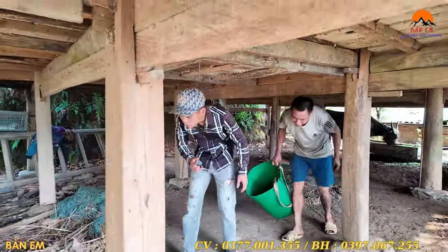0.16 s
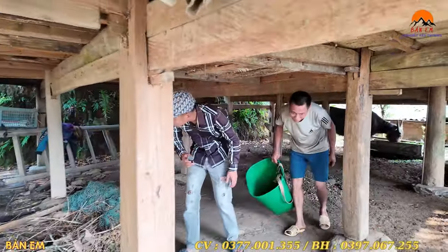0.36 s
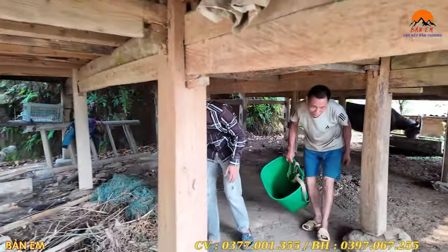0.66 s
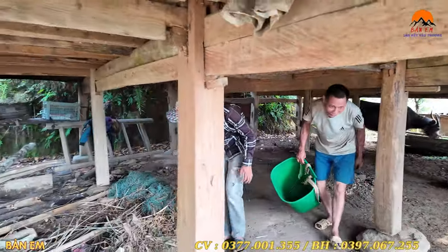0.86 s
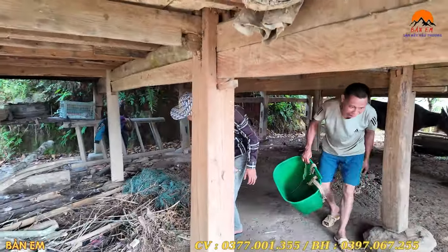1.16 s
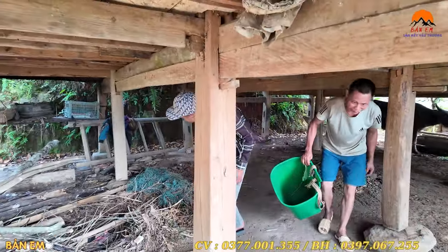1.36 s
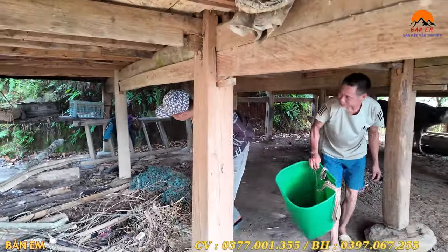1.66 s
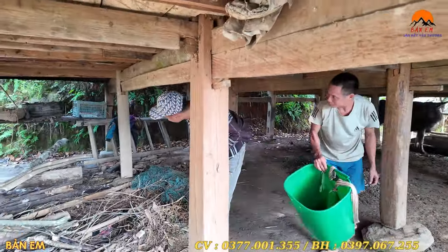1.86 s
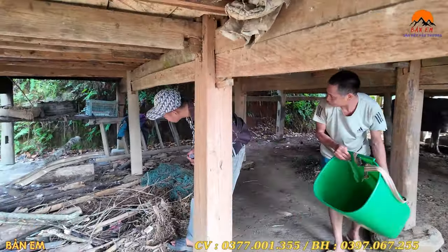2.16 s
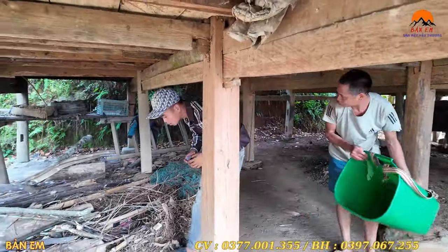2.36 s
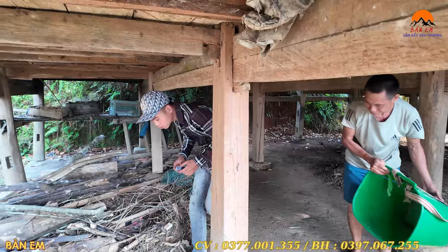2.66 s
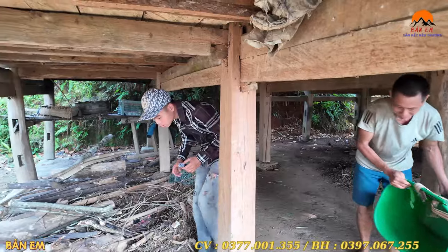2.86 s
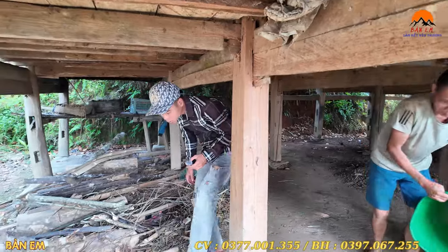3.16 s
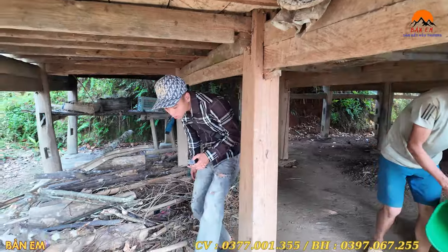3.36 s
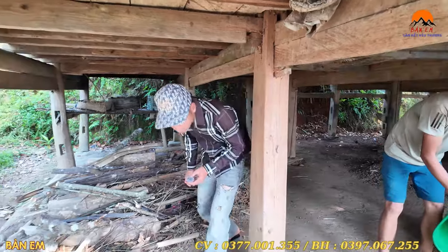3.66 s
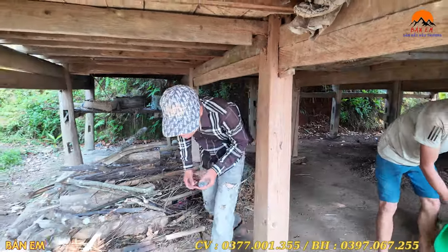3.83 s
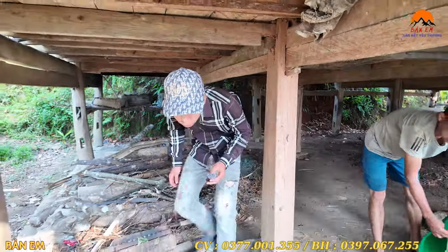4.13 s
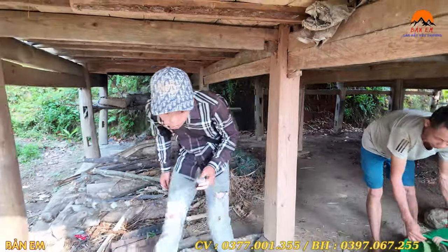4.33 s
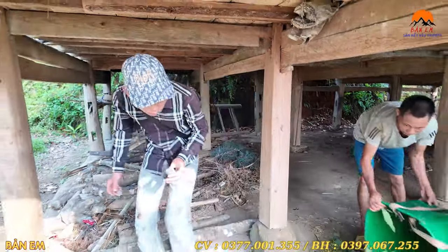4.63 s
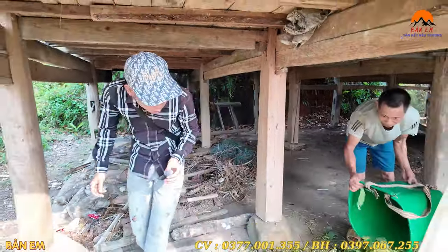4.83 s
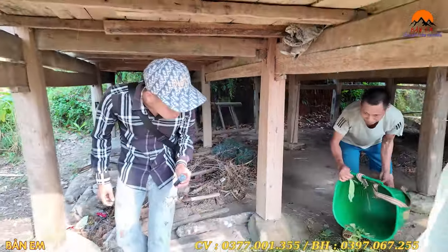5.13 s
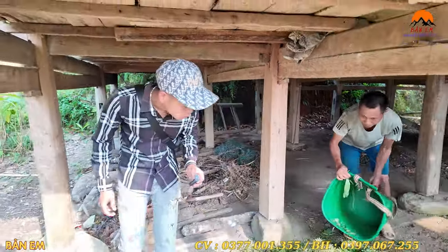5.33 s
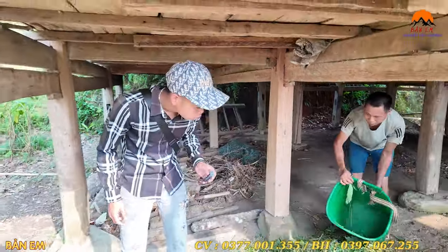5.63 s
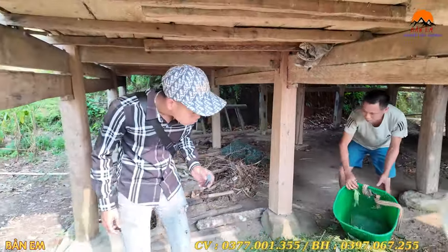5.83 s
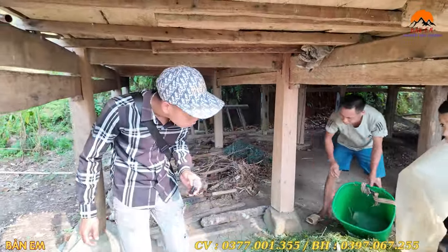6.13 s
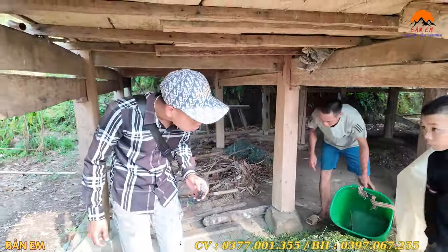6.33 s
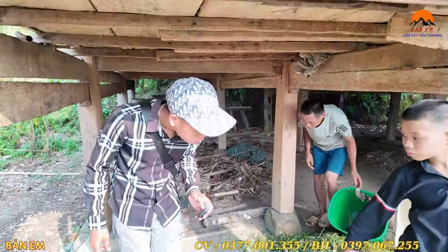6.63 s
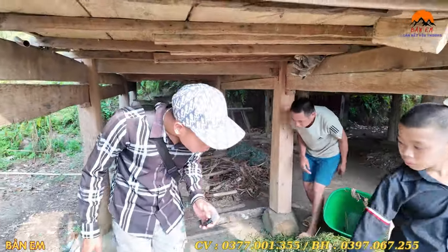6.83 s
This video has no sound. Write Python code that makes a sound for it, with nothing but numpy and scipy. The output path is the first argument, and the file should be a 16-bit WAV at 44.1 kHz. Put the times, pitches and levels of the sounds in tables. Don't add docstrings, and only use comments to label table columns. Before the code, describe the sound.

Two shrill insects drone steadily while feet shuffle over dirt and dry leaves, sticks snap, a loud wooden knock sounds, and a pig grunts in bursts.

```python
import sys
import numpy as np
from scipy import signal
from scipy.fft import rfft, irfft, next_fast_len
from scipy.io import wavfile
from scipy.ndimage import uniform_filter1d

SR = 44100
rng = np.random.default_rng(int(sys.argv[2]) if len(sys.argv) > 2 else 0)


def output_pcm(signal):
    pcm = np.clip(np.atleast_2d(signal).T, -1, 1) * 32767
    wavfile.write(sys.argv[1], SR, np.round(pcm).astype(np.int16))


def how_loud(loudness_db):
    steps = np.asarray(loudness_db, float) / 20
    return 10 ** steps


N = 308259

# (peak [s], length
# [s], scrape [dB], leaf rustle or breath [dB], fine top over the rustle [dB])
FOOTSTEPS = [(0.02, 0.59, -64, -80, -9), (0.174, 0.056, -55.5, -49.5, -15.5), (0.53, 0.23, -73, -78, -2),
             (0.805, 0.11, -53, -67, -10), (1.07, 0.15, -64, -88, -20), (1.322, 0.077, -59, -59, -23),
             (1.751, 0.24, -58.5, -69, -24), (2.24, 0.1, -42.5, -48.5, -17.5),
             (2.446, 0.35, -58, -61.5, -11.5), (2.598, 0.084, -57, -63, -9),
             (3.653, 0.13, -57, -56.5, -13.5), (3.909, 0.31, -62, -74.5, -20),
             (4.152, 0.079, -53, -47, -49), (4.324, 0.57, -57.5, -60, -4.5),
             (4.505, 0.25, -52, -48.5, -12.5), (4.866, 1, -62, -64.5, -11),
             (5.17, 0.069, -44.5, -50.5, -25.5), (5.228, 0.14, -47, -41, -19.5),
             (5.307, 0.116, -51, -72.5, -14), (5.588, 0.62, -56.5, -58.5, -15),
             (5.767, 0.23, -59, -57, -10.5), (6.025, 0.23, -61, -88, -15), (6.294, 1, -62, -66.5, -9.5),
             (6.295, 0.034, -88, -57.5, -9.5), (6.36, 0.033, -83, -60, -14), (6.742, 0.026, -67, -61, -22),
             (6.943, 0.55, -65, -66.5, -19)]


def evened(x):
    return x / np.sqrt(np.mean(x ** 2) + 1e-20)


def steadied(x):
    return evened(x / np.sqrt(uniform_filter1d(x ** 2, size=700) + 0.024 * np.mean(x ** 2)))


def curves(rows, t):
    s, *columns = np.transpose(rows)
    return [np.interp(t, s, c) for c in columns]


def add(mix, s, sound):
    part = mix[round(s * SR):][:len(sound)]
    part += sound[:len(part)]


def resonate(x, modes):
    out = 0
    for hz, width, db in modes:
        r = np.exp(-np.pi * width / SR)
        pole = [1, -r * np.exp(2j * np.pi * hz / SR)]
        ring = signal.lfilter([(1 - r) ** 2], np.convolve(pole, pole), x).real
        out = out + how_loud(db) * 2 * ring
    return out


def tilted(modes, slope_db):
    return [(hz, width, db + slope_db * np.log2(hz / modes[0][0])) for hz, width, db in modes]


def coloured(x, shape):
    hz, db = np.transpose(shape)
    size = next_fast_len(len(x), real=True)
    f = np.fft.rfftfreq(size, 1 / SR)
    gain = how_loud(np.interp(np.log(f + 1), np.log(hz), db, -80))
    return evened(irfft(rfft(x, size) * gain, size)[:len(x)])


def wander(hz, count=N):
    steps = rng.standard_normal(int(count * hz / SR) + 2)
    return np.interp(np.arange(count) * hz / SR, np.arange(len(steps)), steps)


def grains(per_s, spread_db):
    draw = rng.random((N, 2))
    struck = draw[:, 0] < per_s / SR
    return rng.standard_normal(N) * struck * how_loud(-spread_db * np.log(draw[:, 1] + 0.016))


def pig():
    # (start [s], length [s], chest [dB], fold pulse rate [1/s], throat over chest [dB])
    bouts = [
        [(4.139, 0.034, -17, 260, -1.5), (4.152, 0.032, -14.5, 190, -1.5), (4.165, 0.033, -12, 235, -8.5),
         (4.194, 0.016, -14.5, 210, -7), (4.202, 0.029, -9.5, 235, -9), (4.218, 0.026, -21, 280, -7),
         (4.241, 0.022, -12, 230, -6)],
        [(4.259, 0.026, -28, 150, -2.5), (4.273, 0.018, -20.5, 98, 2)],
        [(4.288, 0.047, -29.5, 130, -3.5), (4.32, 0.054, -26, 240, -14), (4.345, 0.037, -27, 260, -38),
         (4.376, 0.037, -32.5, 230, -16), (4.408, 0.051, -32.5, 210, -12.5), (4.438, 0.024, -30, 300, -8.5),
         (4.457, 0.029, -30.5, 200, -13), (4.478, 0.082, -25, 240, -23), (4.546, 0.022, -37, 200, -5.5),
         (4.562, 0.066, -33.5, 240, -18)],
        [(5.449, 0.042, -30.5, 250, 4.5), (5.465, 0.059, -25, 236, -21)],
        [(5.59, 0.031, -30, 250, -12.5), (5.612, 0.033, -30.5, 240, -16), (5.685, 0.051, -40, 120, -8),
         (5.73, 0.033, -34, 120, -19), (5.76, 0.048, -41, 235, -28), (5.806, 0.02, -39, 260, -10),
         (5.826, 0.072, -49, 210, 2.5)],
        [(5.651, 0.01, -33, 100, -2), (5.661, 0.013, -34, 125, -4), (5.669, 0.03, -31, 240, -3)],
        [(5.872, 0.025, -33, 170, -8), (5.889, 0.038, -31.5, 170, -16.5), (5.92, 0.084, -47.5, 150, -6)],
    ]
    # (rise [s], fade by the end [dB], snout hiss over throat [dB],
    # chest tilt [dB/octave], throat tilt [dB/octave])
    manners = [(0.0086, -28.5, -14.5, 4.5, -2), (0.021, 0.5, -1.5, 2.5, -2), (0.018, -18, -20.5, 2, -7),
               (0.0075, -14, -30, 15, -7), (0.0187, -6, -12, 5.5, -8.5), (0.0023, -8.5, -25, -4, -25),
               (0.0107, -14, -7, -13, -6)]
    roughness = [.32, .7, .14, .07, .13, .12, .18]
    dampings = [1.91, 1.2, 1.26, 1.6, 1.4, 5.8, 1.32]
    out = np.zeros(N)
    for rows, *style in zip(bouts, manners, roughness, dampings):
        for row in rows:
            add(out, *grunt(row, *style))
    pen_db, pen_t60 = -16.5, 0.22
    t = np.arange(SR // 3) / SR
    tail = rng.standard_normal(len(t)) * how_loud(-60 * t / pen_t60) * (t > .006)
    out = out + how_loud(pen_db) * signal.fftconvolve(out, tail / np.linalg.norm(tail))[:N]
    return signal.sosfilt(signal.butter(3, 95, "high", fs=SR, output="sos"), out)


def grunt(row, manner, rough, damping):
    # (frequency [Hz], width [Hz], level [dB])
    chest_modes = [(171.2, 13, 2.5), (244, 35, 3.5), (313.2, 20, 0.5), (127, 33, -5), (354.5, 70, -9)]
    throat_modes = [(467, 320, -4.5), (760, 65, -2.5), (904, 130, 0), (1050, 140, -1.5), (1235, 162, -4.5)]
    snout_modes = [(1665, 230, 4), (1980, 210, 5), (2665, 315, 5), (3014, 290, 0), (5270, 3700, -17.5)]
    start, length, chest_db, hz, throat_db = row
    rise, fade_db, snort_db, chest_tilt, throat_tilt = manner
    t = np.arange(-.06, .12, 1 / SR)

    turns = np.cumsum(hz * (1 + .25 * rough * wander(60, count=len(t)))) / SR
    turns = turns - np.interp(.3 * rise, t, turns)
    pulses = np.diff(np.floor(turns), prepend=0)
    pulses = evened(pulses * how_loud(16.0 * rough * wander(147.4, count=len(t))))
    puffs = evened((0.84 + np.exp(-(turns % 1) / 0.11)) * rng.standard_normal(len(t)))

    chest_modes = [(f, width * damping, db) for f, width, db in chest_modes]
    chest_drive = (1 - rough) * pulses + rough * puffs
    throat_drive = (1 - rough) * pulses + (1.4 * rough + .1) * puffs
    chest = steadied(resonate(chest_drive, tilted(chest_modes, chest_tilt)))
    throat = steadied(resonate(throat_drive, tilted(throat_modes, throat_tilt)))
    snort = evened(resonate(puffs + 0.078 * pulses, snout_modes))

    mouth_db = -6 * np.clip(t / length, 0, 1)
    voice = chest + how_loud(throat_db + mouth_db) * (throat + how_loud(snort_db) * snort)
    fading = np.clip((t - rise) / max(length - rise, .004), 0, 1)
    edges = np.clip(np.minimum(t / rise, (length - t) / .006), 0, 1)
    level = how_loud(chest_db + fade_db * fading ** 1.57) * np.sin(edges * np.pi / 2)
    return start + t[0], level * voice


def slaps():
    # (time [s], peak [dB], pitch [Hz],
    # width [s])
    single_slaps = [(4.148, -16, 930, 0.002), (4.178, -15.5, 1010, 0.0014), (4.2093, -8.5, 303, .004),
                    (4.2505, -13.5, 954, 0.003), (4.2839, -25, 1956, 0.0034), (5.4578, -25, 537, 0.0047),
                    (5.4685, -28.5, 760, 0.0057), (4.185, -19.5, 170, .007), (4.211, -15, 166, 0.0097),
                    (4.293, -24.5, 158, 0.0085), (5.871, -40.5, 745, .004), (5.672, -28, 145, .012),
                    (4.2, -27, 105, .015), (6.378, -50, 217, .015), (6.7515, -40, 2200, .0004),
                    (5.623, -42, 990, 0.0047), (1.3242, -37, 2520, 0.00026), (1.335, -35, 2500, 0.00016),
                    (2.4877, -32, 1150, 0.00052), (2.5995, -33.5, 5270, 0.002), (2.8, -45, 1300, 0.00042),
                    (1.0535, -29, 870, 0.0011), (1.053, -32, 1594, 0.0019), (1.099, -38, 1000, 0.0018),
                    (1.1, -44, 1500, .003),
                    (5.6545, -21, 300, .0026), (5.6635, -21.5, 330, .0028), (5.6722, -14.5, 280, .002),
                   (5.6802, -17.5, 250, .0026)]
    out, lag = np.zeros(N), np.arange(-1200, 2000) / SR
    for s, db, hz, width in single_slaps:
        shape = np.exp(-(lag / np.where(lag < 0, width, 1.5 * width)) ** 2)
        add(out, s + lag[0], how_loud(db) * np.cos(2 * np.pi * hz * lag) * shape)
    return out


def near_insect():
    # (time [s], main line [dB], its octave [dB], line above main [dB], line above octave [dB])
    levels = [(0.0, -55.5, -60.5, -56, -65), (0.49, -49.5, -59.5, -64, -63), (0.66, -54, -54, -67, -58),
              (0.72, -59, -63.5, -61, -61.5), (1.15, -50, -64.5, -70, -64.5), (1.26, -61, -62, -67, -61),
              (1.34, -50, -60, -57, -59), (1.54, -60, -61, -63, -67), (1.95, -56.5, -65.5, -62.5, -75),
              (2.12, -57, -59.5, -66, -75), (2.28, -55, -60.5, -61, -68), (3.17, -59, -55, -60.5, -68),
              (3.39, -56.5, -69, -62, -71), (3.6, -48, -56, -62, -57.5), (3.72, -58, -58, -63.5, -71),
              (4.77, -52.5, -58, -57.5, -62), (6.77, -56.5, -59, -65.5, -59.5),
              (6.99, -56, -64.5, -75, -76)]
    # (time [s], click rate [1/s], unevenness [share])
    rate = [(0, 281.7, .0004), (1.2, 281.9, .0004), (2.5, 282.2, .0004), (4, 282.5, .0004),
            (5.6, 282.1, .0004), (6.66, 282.1, .0006), (6.74, 283.9, .0035), (7, 284.8, .0035)]
    pauses = [.13, .5, .875, 1.254, 1.6, 1.97, 2.34, 2.7, 3.05, 3.41, 3.741, 4.13, 4.47, 4.85, 5.2, 5.58,
              5.933, 6.292, 6.65]
    orders = [13, 14, 14.5, 15, 15.5, 16, 17, 27, 28, 28.5, 29, 29.5, 30, 30.5, 31, 42, 43, 44, 55]
    lines = [-13, 0, -23, -8, -22, -19, -25, -15, 0, -17, -7, -19, -19, -24, -25, -29, -35, -38, -28]
    return insect(levels, rate, pauses, orders, lines, own=(14, 28, 15, 29),
                  fade_db=2.4, pause_db=-9, rasp_db=17)


def other_insect():
    # (time [s], main line [dB], its octave [dB])
    levels = [(0.0, -55, -60), (0.39, -58.5, -62), (1.95, -55, -66.5), (2.12, -61, -58), (2.28, -49, -65),
              (3.11, -63.5, -58), (3.39, -52.5, -66), (3.62, -56.5, -63), (3.83, -58.5, -65),
              (4.42, -52.5, -64), (4.88, -49.5, -60.5), (4.98, -66, -52.5), (5.04, -59, -67),
              (5.2, -49.5, -60.5), (5.65, -57, -58), (5.68, -51.5, -52.5), (6.19, -56, -63.5),
              (6.99, -55, -58.5)]
    # (time [s], click rate [1/s], unevenness [share])
    rate = [(0, 290.7, .0006), (1.4, 291.2, .0006), (2.8, 291.6, .001), (3.1, 294, .0028),
            (3.7, 295.3, .0028), (4.1, 293.5, .0028), (4.55, 290.6, .002), (4.7, 290.2, .0006),
            (7, 290.4, .0006)]
    pauses = [.18, .53, .868, 1.21, 1.545, 1.88, 2.24, 2.6, 4.73, 5.05, 5.44, 5.817, 6.185, 6.49, 6.859]
    orders = [12, 13, 14, 25, 26, 27, 39, 40, 51, 52, 53]
    lines = [-14, 0, -13, -13, 0, -11, -27, -33, -23, -22, -27]
    return insect(levels, rate, pauses, orders, lines, own=(13, 26),
                  fade_db=3.5, pause_db=-8, rasp_db=22)


def insect(levels, rate, pauses, orders, lines, own, fade_db, pause_db, rasp_db):
    # (time [s], throb rate [1/s])
    throb_rate = [(2.8, 25), (3.3, 23), (3.7, 18), (4.6, 16), (6.6, 18), (7, 18)]
    t = np.arange(N) / SR
    level = dict(zip(own, curves(levels, t)))
    low_db, high_db = level[own[0]], level[own[1]]
    hz, blur = curves(rate, t)

    nearest = abs(t[::64, None] - np.array(pauses)).min(axis=1).repeat(64)[:N]
    pause = np.exp(-(nearest / .028) ** 2)
    sag = .0025 * pause
    turns = np.cumsum(hz * (1 - sag + blur * 1.3 * wander(220))) / SR
    rasp = np.maximum(np.exp(-(nearest / .055) ** 2), np.clip(blur / .003, 0, 1) ** 2)
    throb_turns = np.cumsum(curves(throb_rate, t)[0]) / SR
    throb = 1 + np.clip(blur / .0028 - .5, 0, .42) * np.sin(2 * np.pi * throb_turns)

    out = np.zeros(N)
    for k, db in zip(orders, lines):
        fade = fade_db * wander(9) * (k not in own)
        beat = (.95 + (.36 if k < 20 else .48) * wander(22)) * throb
        shape_db = rasp_db * (rasp - 1) if k > 50 else pause_db * pause
        group_db = low_db if k < 20 else high_db if k < 35 else high_db.mean()
        base_db = level.get(k, group_db + db)
        smear = .2 * k ** 2 / (1 + 0.2 * (k > 20))
        line = np.sin(2 * np.pi * (k * turns + smear))
        out += np.sqrt(2) * beat * how_loud(base_db + fade + shape_db) * line
    return out


def strides():
    rise, fade_db = 0.56, -24.5
    peak, length = np.transpose(FOOTSTEPS)[:2]
    late = (np.arange(0, N + 64, 64)[:, None] / SR - peak) / length
    return how_loud(fade_db * np.maximum(late, -late / rise))


def stepped(bed_db, step_db):
    level = how_loud(bed_db) + strides() @ how_loud(step_db)
    return np.interp(np.arange(N) / 64, np.arange(len(level)), level)


def feet():
    # (frequency [Hz], level [dB])
    thud_shape = [(40, -17.5), (80, -3), (160, -2.5), (240, 4), (330, 1.5), (500, -1), (900, -55)]
    # (frequency [Hz], level [dB])
    scrape_shape = [(250, -15), (500, -6.5), (1000, -7), (2000, -8), (3000, -9.5), (4500, -21.5),
                    (8000, -52)]
    drag = stepped(-82, np.transpose(FOOTSTEPS)[2])
    thud_level = how_loud(-67.0) * (drag / how_loud(-60.5)) ** 0.66
    thud = thud_level * coloured(grains(590, 1.3), thud_shape)
    return thud + drag * coloured(grains(3000, 0.95), scrape_shape)


def leaves():
    # (frequency [Hz], level [dB])
    rustle_shape = [(1500, -25.5), (2700, -1.5), (4000, 1), (5300, -1.5), (6700, -3.5), (7600, -7.5),
                    (10000, -42.5)]
    # (frequency [Hz], level [dB])
    crisp_shape = [(7000, -9), (9000, 0.5), (11000, -1.5), (13000, -5), (15600, -17)]
    litter_db = -68
    rustle_db, crisp_db = np.transpose(FOOTSTEPS)[3:]
    crush = grains(9000, 2.4)
    fine = stepped(litter_db - 24.0, rustle_db + crisp_db)
    rustle = stepped(litter_db, rustle_db) * coloured(crush, rustle_shape)
    return rustle + fine * coloured(crush, crisp_shape)


def snaps():
    # (time [s], peak [dB], pitch [Hz], t60 [s])
    sticks = [(0.741, -47.5, 960, 0.23), (1.05, -33.5, 1100, 0.12), (1.034, -54, 1000, .1),
              (1.063, -50, 1300, .1), (1.075, -43, 1290, 0.091), (1.081, -46, 900, 0.046),
              (1.091, -36, 960, 0.12), (1.102, -40, 1060, 0.053), (1.099, -49, 2430, .06),
              (1.128, -57, 1000, .04), (2.171, -40, 860, 0.32), (2.224, -30, 2630, 0.32),
              (2.474, -41, 446, 0.13), (2.488, -36.5, 935, 0.054), (2.59, -32.5, 1050, 0.037),
              (2.641, -49, 820, 0.12), (2.674, -44, 1080, 0.026), (2.8, -44.5, 1060, 0.029),
              (2.965, -51, 1560, 0.076), (3.644, -50, 1370, 0.12), (4.837, -36, 2600, 0.068),
              (4.966, -42, 1450, 0.051), (3.537, -49, 1140, 0.11), (5.62, -46, 965, 0.079),
              (5.625, -36, 3030, 0.048), (5.674, -40, 2480, .08), (2.164, -48, 900, 0.097),
              (2.183, -52, 950, 0.11), (2.211, -39.5, 1300, 0.14), (2.228, -35, 6480, 0.17),
              (2.237, -36, 2700, .08), (2.25, -39, 5500, .15), (2.262, -34.5, 1810, 0.13),
              (2.288, -41, 6000, 0.16), (2.308, -38, 5870, 0.11), (2.32, -47, 6450, .08),
              (2.41, -43.5, 1880, .1), (2.652, -47, 900, 0.042), (5.652, -39, 1400, .08),
              (5.734, -50, 2800, .08), (5.785, -46, 1140, .06), (5.869, -42, 756, 0.099),
              (6.274, -49.5, 463, 0.098)]
    out, t = np.zeros(N), np.arange(4096) / SR
    for s, db, hz, t60 in sticks:
        blow = (how_loud(-200 * t / t60) + 0.26 * how_loud(-60 * t / t60)) * np.minimum(t / 0.0027, 1)
        blow = blow * rng.standard_normal(len(t))
        blow = blow + 3.5 * (t60 < .07) * (np.arange(len(t)) == 66)
        ring = resonate(blow, [(hz, 450, 0), (1.47 * hz, 500, -4 - hz / 250)])
        band = signal.butter(2, [.62 * hz, 2.3 * hz], "band", fs=SR, output="sos")
        ring = signal.sosfilt(band, ring)
        add(out, s - .0015, how_loud(db) * ring / abs(ring).max())
    return out


def cracks():
    # (time [s], peak [dB], tilt above 4 kHz [dB/octave], t60 [s])
    ticks = [(0.165, -50, 8, 0.042), (0.5023, -45, -8, 0.22), (0.6594, -44, 6, 0.18),
             (1.325, -34, -15, 0.029), (1.336, -43, -12, 0.02), (2.2277, -31.5, -4, 0.03),
             (2.266, -37, -1, 0.083), (2.3107, -37, 0, 0.14), (2.431, -39, 0.5, 0.045),
             (2.47, -36.5, -12, 0.032), (2.495, -41.5, -1, 0.033), (2.594, -40, 4, .06),
             (2.5987, -26, 1.5, 0.035), (2.7707, -42.5, -2.5, 0.09), (2.8817, -37, -19.5, 0.085),
             (3.697, -41, -5, 0.022), (3.866, -40, -18, 0.013), (4.82, -36.5, -5, 0.14),
             (5.7728, -33.5, 6, 0.055), (6.008, -42, -25.5, 0.076), (6.4884, -38.5, -7, 0.028),
             (6.752, -34, -16, 0.024)]
    out, t = np.zeros(N), np.arange(4096) / SR
    for s, db, tilt_db, t60 in ticks:
        shape = [(200, 0.5), (1000, 2.4), (4000, 5.0), (7000, tilt_db + 2.5),
                 (9000, 2 * tilt_db - 13.5), (16000, 2 * tilt_db - 21)]
        crack = coloured(rng.standard_normal(len(t)), shape)
        bite = 1 + 1.5 * (t60 < .028) * np.exp(-t / .0015)
        attack = np.minimum(t / (.0003 + .04 * t60), 1)
        crack = crack * how_loud(-60 * t / t60) * bite * attack
        add(out, s - .0015, how_loud(db) * crack / abs(crack).max())
    return out


def hollow_knock():
    # (peak [dB], pitch [Hz], width [s])
    knock_tone = (-8, 1130, 0.00087)
    # (delay [s], level [dB])
    echoes = [(.0055, -25), (.0095, -22), (0.012, -21), (0.016, -28), (.02, -34), (.024, -35.5)]
    out = np.zeros(N)
    db, hz, width = knock_tone
    lag = np.arange(4096) / SR - .003
    knock = how_loud(db) * np.cos(2 * np.pi * hz * lag) * np.exp(-(lag / width) ** 2)
    body = np.cos(2 * np.pi * 350 * lag) * np.exp(-(lag / 0.0013) ** 2)
    knock = knock + 0.053 * how_loud(db) * body
    start = 2.8821 - .003
    add(out, start, knock)
    for late, echo_db in echoes:
        add(out, start + late, how_loud(echo_db) * knock)
    return out


def bumps():
    # (time [s], level [dB], pitch [Hz], t60 [s])
    puffs = [(0.06, -53, 190, 0.22), (0.083, -46, 343, 0.093), (0.107, -44.5, 370, 0.078),
             (.125, -44, 209, 0.18), (.17, -54.5, 241, 0.38), (.35, -58.5, 48.3, 0.083),
             (0.691, -54, 40.4, 0.76), (1.175, -61, 110, 0.15), (2.24, -57, 48, 0.12),
             (2.681, -60, 64.6, 0.13), (2.781, -48.5, 240, 0.055), (2.835, -53.5, 240, 0.079),
             (2.469, -44, 64.5, 0.047), (2.594, -41, 290, 0.06), (3.533, -42.5, 211, 0.13),
             (3.63, -59.5, 72, 0.79), (3.851, -56, 547, 0.59), (3.867, -61, 1305, 1.8),
             (4.721, -45, 226, 0.6), (4.91, -43.5, 232, 0.16), (5.901, -51, 71, 0.39),
             (5.683, -42, 2850, 0.17), (5.7, -54, 2800, 0.18), (6.061, -44.5, 227, 0.13),
             (6.271, -40.5, 120, 0.044), (4.299, -49.5, 86, 1.06), (6.35, -44.5, 448, 0.087),
             (6.551, -53, 205, 0.5)]
    out, t = np.zeros(N), np.arange(SR // 2) / SR
    for s, db, hz, t60 in puffs:
        noise = rng.standard_normal(len(t) + 2000)
        hum = steadied(resonate(noise, [(hz, min(30 + .4 * hz, 100), 0)]))[2000:]
        swell = np.minimum(t / (.12 * t60), 1) * how_loud(3 * wander(50, count=len(t)))
        add(out, s, how_loud(db - 60 * t / t60) * swell * hum)
    return out


def bird():
    # (start [s], length [s], level [dB])
    chirps = [(.065, .06, -2), (.255, .07, 1.5), (.445, .07, 2), (6.58, .13, -2), (6.81, .12, -2)]
    out = np.zeros(N)
    for s, length, db in chirps:
        t = np.arange(0, length, 1 / SR)
        hz = 4500 + 9500 * t + 40 * wander(200, count=len(t))
        whistle = np.sin(2 * np.pi * np.cumsum(hz) / SR)
        add(out, s, how_loud(-63.5 + db) * np.hanning(len(t)) ** .5 * whistle)
    return out


def chorus():
    # (frequency [Hz], width [Hz], level [dB])
    hiss_bands = [(3764, 440, -61), (3440, 1030, -66), (7870, 780, -66.5), (11950, 1200, -99),
                  (15270, 600, -99)]
    noise = rng.standard_normal(N)
    bands = sum(how_loud(db) * evened(resonate(noise, [(hz, width, 0)])) for hz, width, db in hiss_bands)
    return bands * how_loud(0.57 * wander(9.4))


def open_air():
    # (frequency [Hz], level [dB])
    air_shape = [(20, -17), (60, -0.5), (150, -0.5), (300, -0.5), (800, -3), (2300, -2.5), (4500, -6),
                 (6400, -39.5), (9500, -20.5), (15600, -44)]
    # (time [s], half length [s], level [dB])
    lull = (3.15, .25, -4)
    middle, half, lull_db = lull
    air = how_loud(-68) * coloured(rng.standard_normal(N), air_shape)
    return air * how_loud(lull_db * np.exp(-((np.arange(N) / SR - middle) / half) ** 2))


def scene():
    animal = pig() + slaps()
    drones = near_insect() + other_insect()
    ground = feet() + leaves() + snaps() + cracks() + hollow_knock()
    background = bumps() + bird() + chorus() + open_air()
    return (animal + drones + ground + background)[None]


def top_cut(x):
    return signal.sosfilt(signal.butter(12, 15720, fs=SR, output="sos"), x)


def record(dry):
    softened = 0.95 * np.tanh(dry / 0.83)
    return top_cut(softened)


dry = scene()
out = record(dry)
output_pcm(out)
```